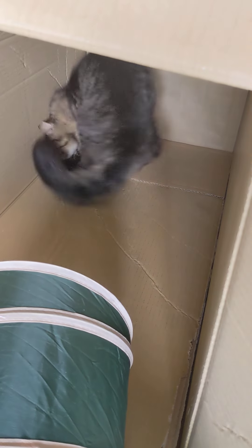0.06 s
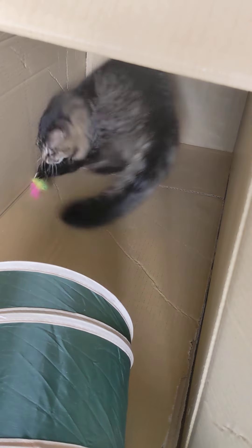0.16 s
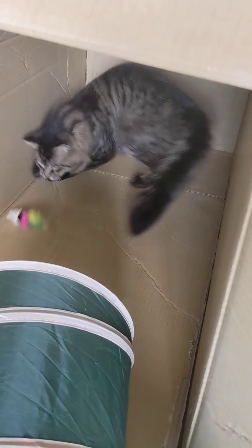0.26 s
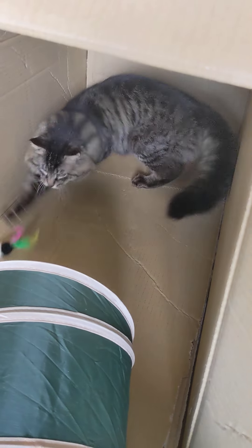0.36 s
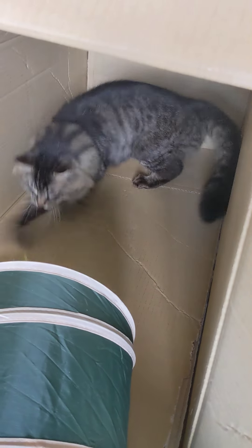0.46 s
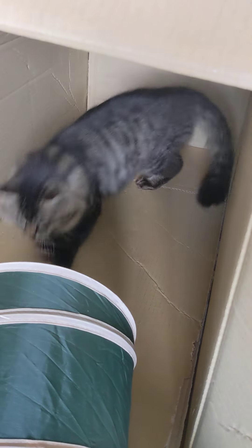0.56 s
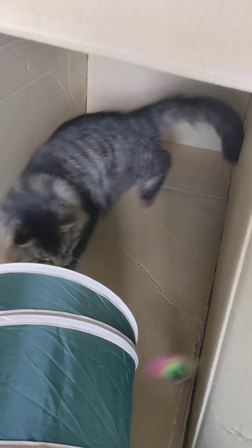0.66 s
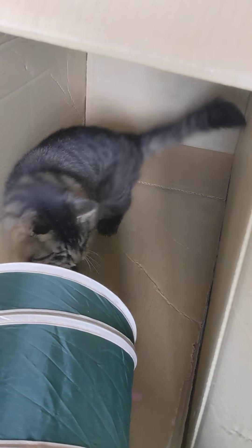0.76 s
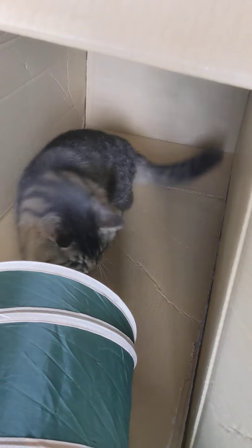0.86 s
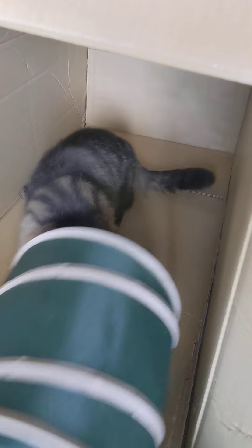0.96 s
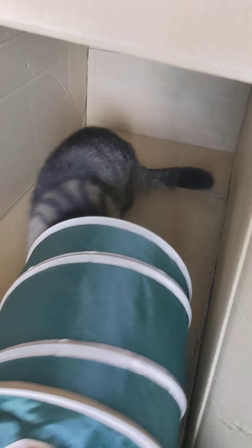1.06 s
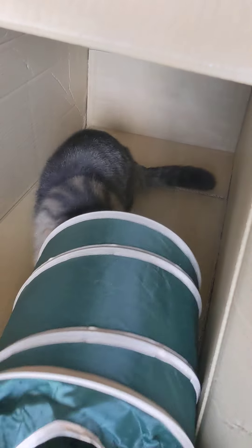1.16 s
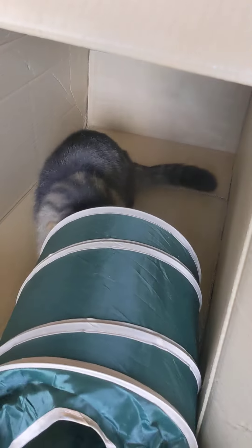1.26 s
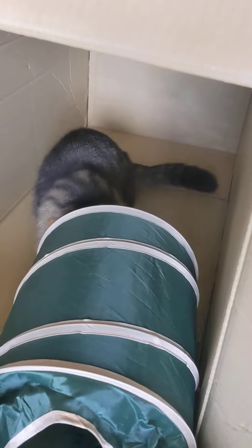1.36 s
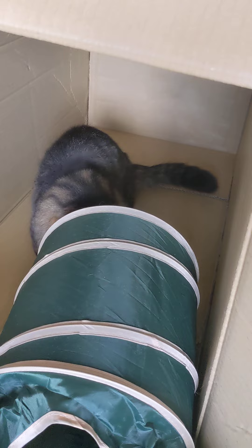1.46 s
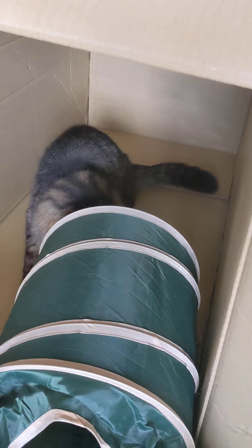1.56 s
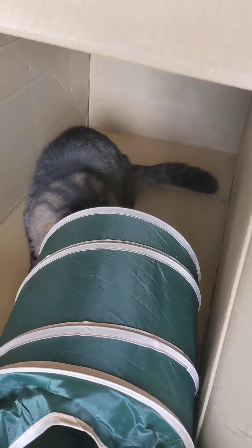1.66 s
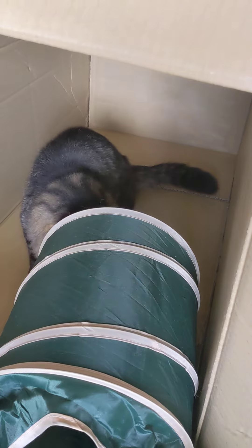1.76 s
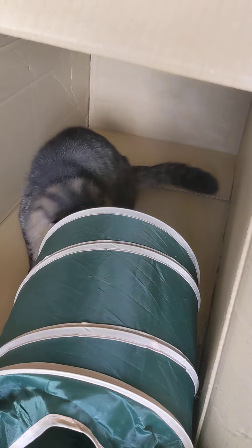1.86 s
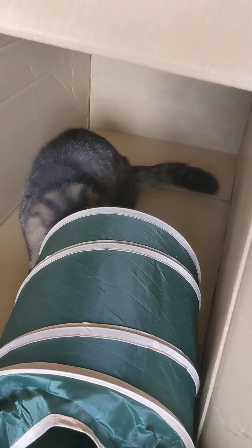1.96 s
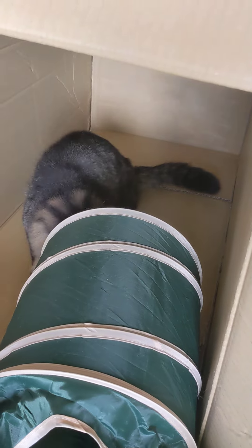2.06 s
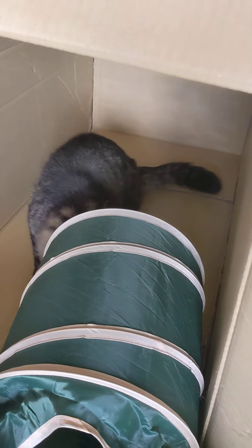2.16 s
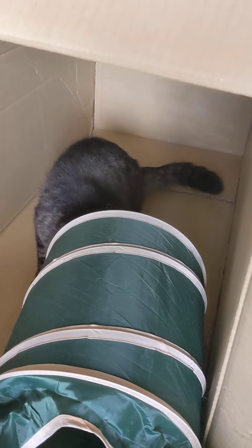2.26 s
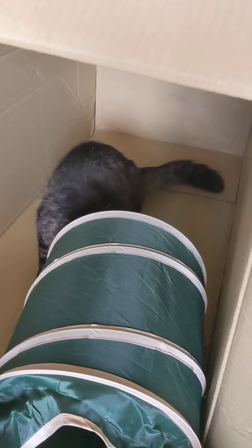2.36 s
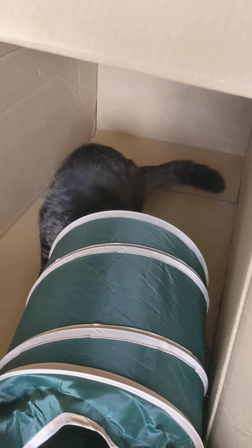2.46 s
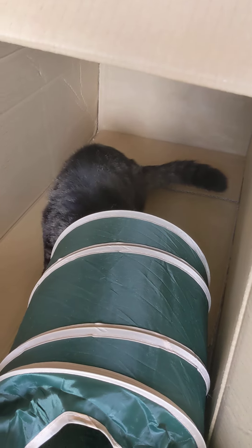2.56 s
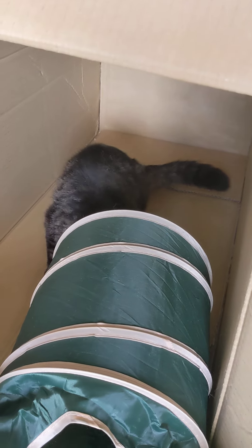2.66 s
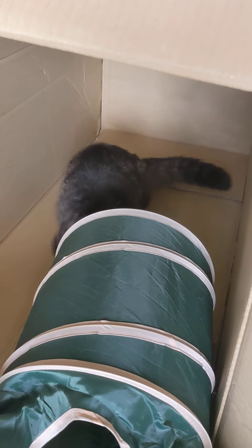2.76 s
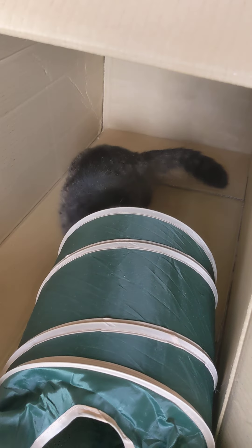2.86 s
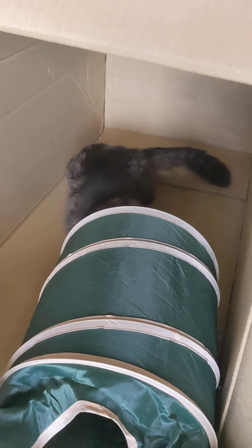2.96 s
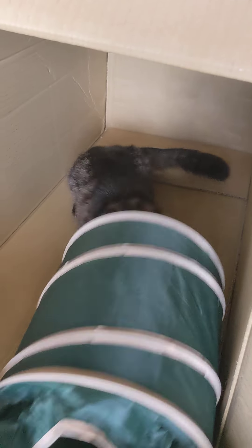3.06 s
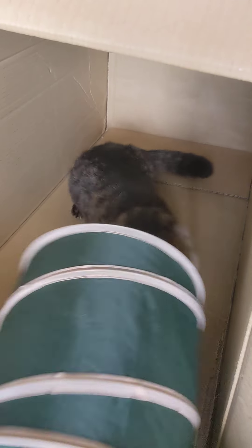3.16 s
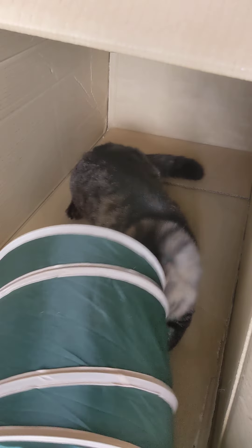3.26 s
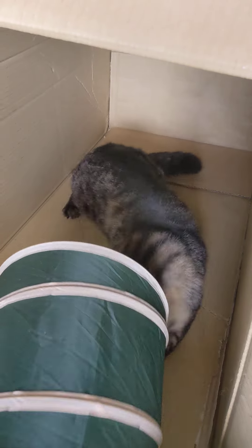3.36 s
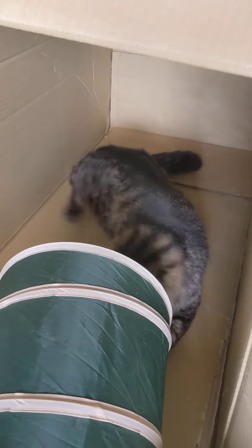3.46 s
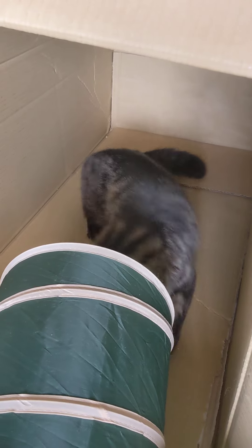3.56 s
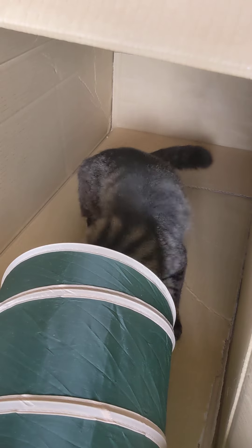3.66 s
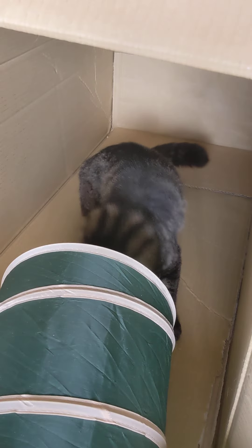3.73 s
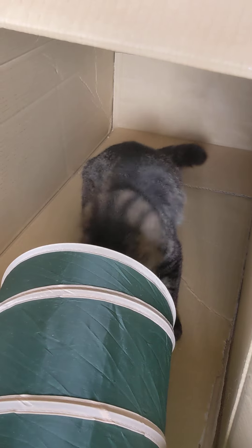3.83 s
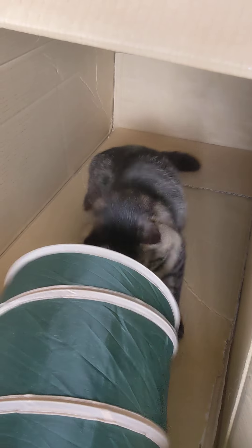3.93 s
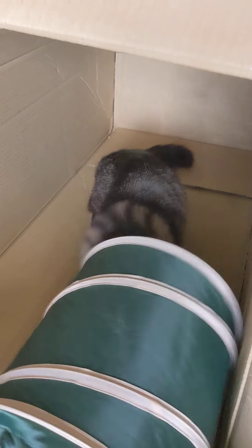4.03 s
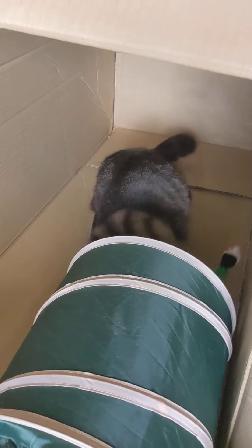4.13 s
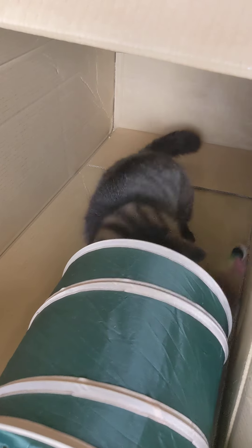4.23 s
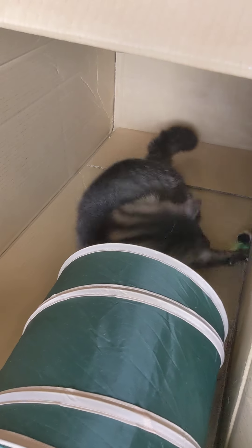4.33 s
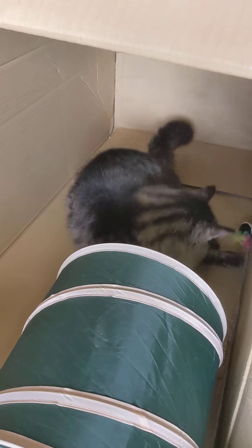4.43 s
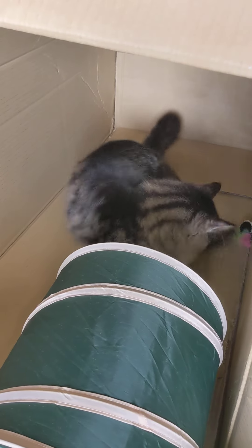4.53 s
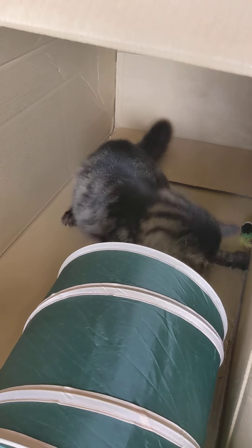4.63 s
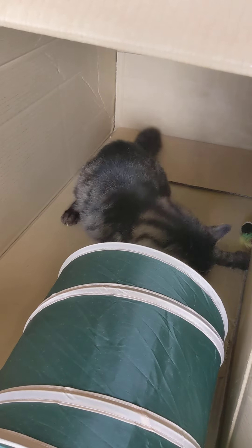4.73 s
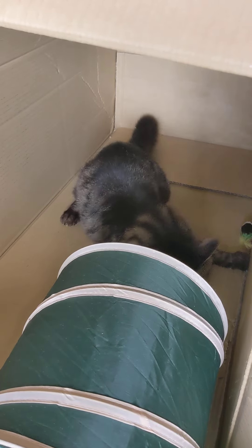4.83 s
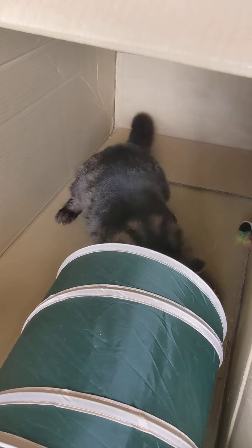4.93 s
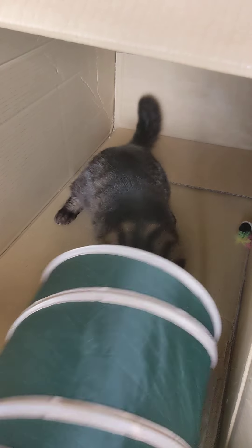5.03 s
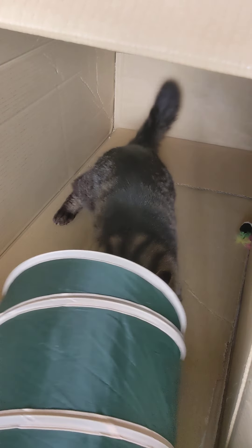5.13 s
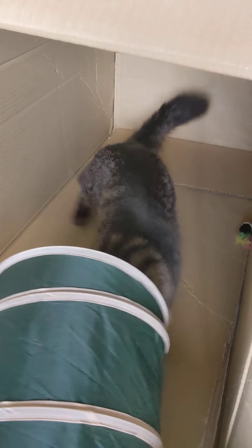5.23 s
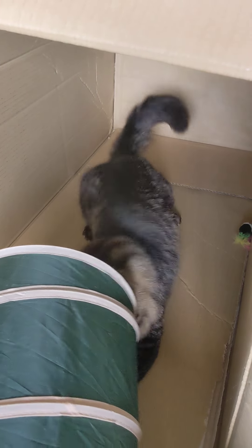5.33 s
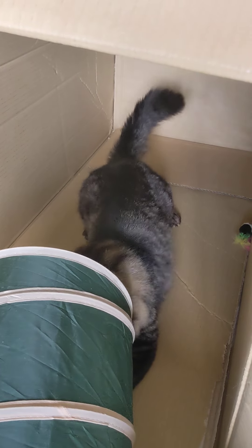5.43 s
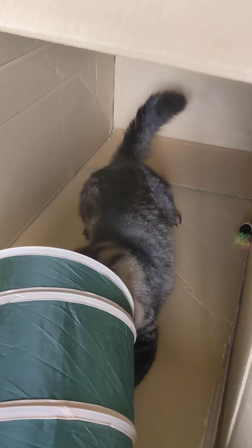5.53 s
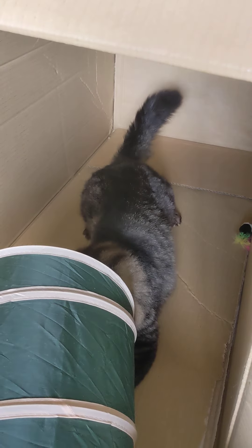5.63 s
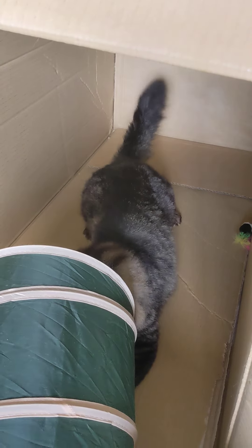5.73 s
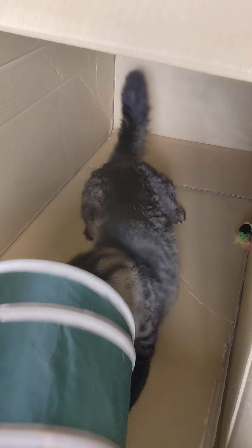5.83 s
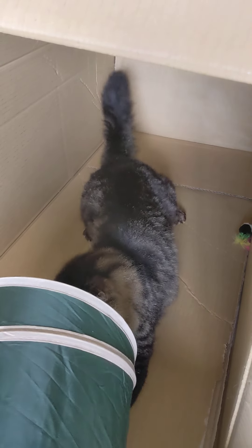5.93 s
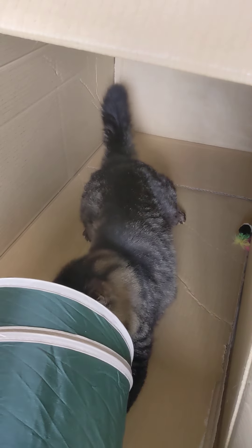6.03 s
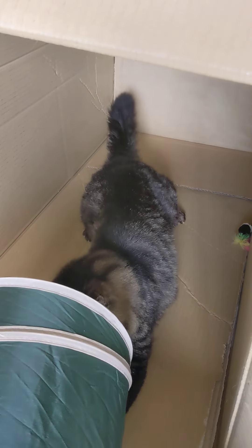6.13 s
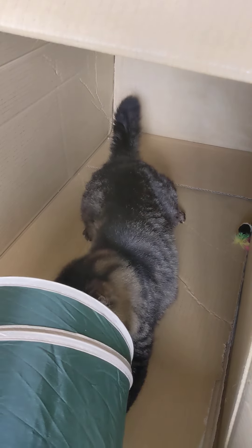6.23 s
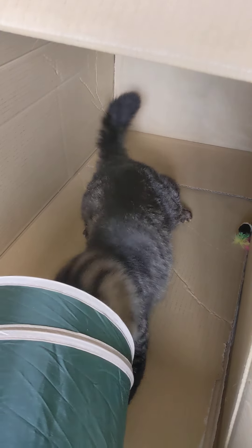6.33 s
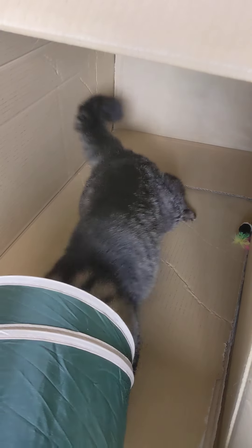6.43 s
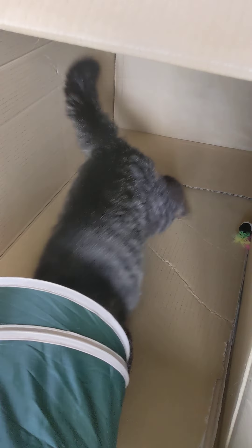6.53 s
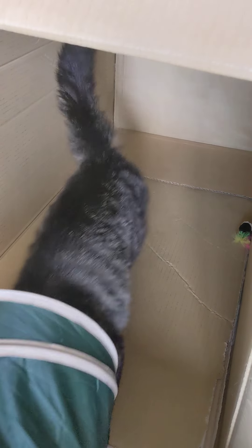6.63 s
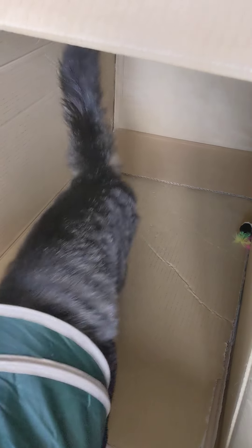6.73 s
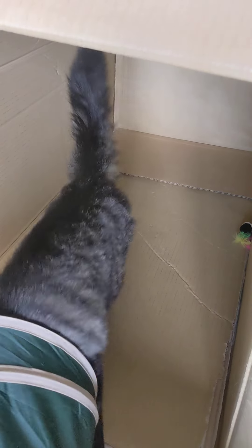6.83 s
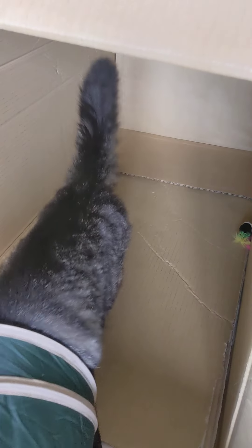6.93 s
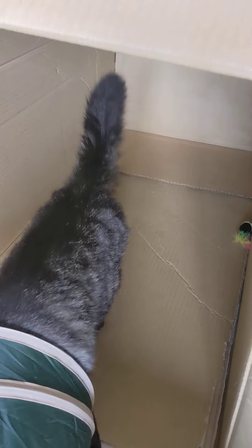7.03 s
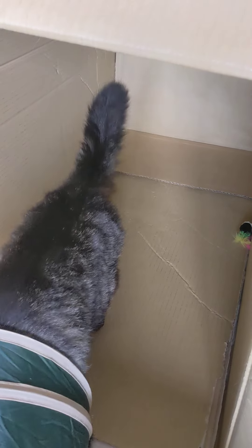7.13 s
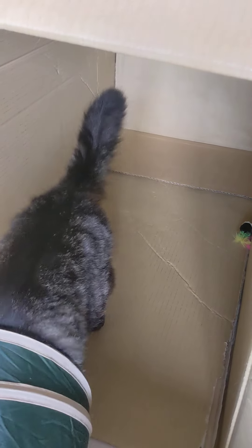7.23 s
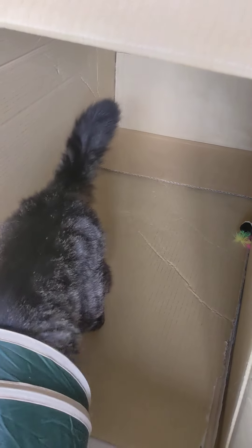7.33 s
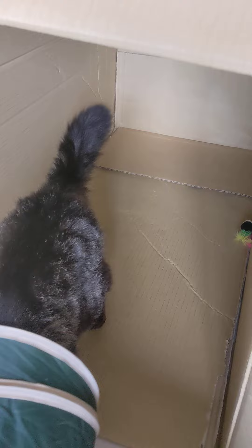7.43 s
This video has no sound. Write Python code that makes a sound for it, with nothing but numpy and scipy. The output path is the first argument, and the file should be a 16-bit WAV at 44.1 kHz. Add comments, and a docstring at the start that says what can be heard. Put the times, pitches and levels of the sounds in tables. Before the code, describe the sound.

A cat scrambles inside a big cardboard box, paws knocking and claws ticking, while a nylon tunnel swishes and scrapes, gradually settling into soft sparse rustles.

```python
"""A cat chases a toy around a big cardboard box, shoving a nylon play tunnel that lies in it.
A quiet room drones throughout. From the start paws knock the board (falling chirps, ringing sides,
booming floor), claws tick (bursts of noise), and nylon swishes over scraping cardboard (rough noise).
Dragged claws rasp from half a second on. From 1.3 to 3 s there is only rubbing; then knocks and scuffs
return, with the strongest shove at 4.2 s, and from 5.5 s all grows softer and sparser."""
import sys
import numpy as np
from scipy import signal
from scipy.fft import rfft, irfft, next_fast_len
from scipy.io import wavfile
from scipy.ndimage import map_coordinates

SR = 44100
rng = np.random.default_rng(int(sys.argv[2]) if len(sys.argv) > 2 else 0)


def generate_wav(signal):
    """Clip the signal to [-1, 1] and save it as 16-bit WAV at the path in sys.argv[1]."""
    frames = np.transpose(np.atleast_2d(signal))
    scaled = np.clip(frames, -1, 1) * 32767
    pcm = np.round(scaled).astype(np.int16)
    wavfile.write(sys.argv[1], SR, pcm)


N = 330353  # length in samples, about 7.5 s


def amp(db):
    """Turn decibels into a gain."""
    return 10 ** (np.asarray(db) / 20)


def unit(x):
    """Scale to an rms of 1."""
    return x / np.sqrt(np.mean(x ** 2) + 1e-20)


def along(points, hz):
    """Read a curve of (Hz, value) points on a log frequency axis."""
    point_hz, values = np.transpose(points)
    return np.interp(np.log(hz + 1), np.log(point_hz), values)


def wobble(rate):
    """A smooth random curve through `rate` random points a second."""
    points = rng.standard_normal(int(N * rate / SR) + 4)
    return map_coordinates(points, [np.arange(N) * rate / SR])


def filtered(x, response):
    """Colour a sound by a gain that depends on frequency."""
    n = x.shape[-1]
    padded_n = next_fast_len(n + 4096)
    hz = np.fft.rfftfreq(padded_n, 1 / SR)
    return irfft(rfft(x, padded_n) * response(hz), padded_n)[..., :n]


# How alike left and right are: pitch_hz, likeness (1 = the same, 0 = unrelated)
LIKENESS = [(100, 0.98), (300, 0.84), (650, 0.59), (1100, 0), (2000, 0.13), (4000, 0)]


def spread(pair, gain):
    """Colour two unrelated signals and mix them to stereo of rms 1: alike in the bass, apart in the treble."""
    def mid_and_side(hz):
        turn = np.arccos(np.clip(along(LIKENESS, hz), -1, 1)) / 2
        return gain(hz) * np.array([np.cos(turn), np.sin(turn)])

    mid, side = filtered(pair, mid_and_side)
    return unit(np.array([mid + side, mid - side]))


def hiss(spectrum, size):
    """Steady stereo noise with a given spectrum."""
    return spread(rng.standard_normal((2, size)), lambda hz: amp(along(spectrum, hz)))


def fade(t, rise, t60):
    """An envelope of peak 1 that rises, then dies away by 60 dB in t60 seconds."""
    shape = (1 - np.exp(-(t / rise) ** 2)) * amp(-60 * t / t60)
    return shape / (shape.max() + 1e-12)


def add(track, s, sound):
    """Mix a sound into the track at s seconds."""
    start = max(round(s * SR), 0)
    track[:, start:start + sound.shape[-1]] += sound[..., :N - start]


# How long the box walls answer: pitch_hz, t60_s
WALL_DECAY = [(100, 0.49), (400, 0.22), (1000, 0.26), (4000, 0.12), (14000, 0.13)]


def walls(x, wet_db):
    """Box walls throw a sound back many times: the sound plus a short fading tail of noise."""
    noise = rng.standard_normal((2, SR // 4))
    hz, t, cells = signal.stft(noise, SR, nperseg=256)
    fading = cells * amp(-60 * t / along(WALL_DECAY, hz)[:, None])
    tail = spread(signal.istft(fading, SR, nperseg=256)[1], np.ones_like)
    tail = tail / np.linalg.norm(tail[0])
    tail = np.pad(tail, ((0, 0), (SR // 400, 0)))  # the answer starts 2.5 ms late
    return x + amp(wet_db) * signal.fftconvolve(np.atleast_2d(x), tail, axes=1)[:, :x.shape[-1]]


# Colour of the room's rush: pitch_hz, level_db (relative, per Hz)
ROOM_COLOUR = [(20, -32), (40, -1.5), (60, 0.5), (100, 0.5), (180, -8), (330, -9.5), (420, -10), (750, -10),
               (950, -16.5), (1800, -24), (3000, -28), (6000, -28), (11000, -43), (15500, -39)]
# Narrow bands in the room's noise: pitch_hz, width_hz, level_db (relative)
ROOM_BANDS = [(558, 17, 3.5), (1366, 41, -8), (2352, 62, -3.5), (3040, 110, -15.5)]


def room():
    """A faint steady rush of noise, plus noise passed through a few narrow resonances."""
    def bands(hz):
        total = 0
        for pitch_hz, width_hz, db in ROOM_BANDS:
            damping = 1j * hz * width_hz
            total = total + amp(db) * damping / (pitch_hz ** 2 - hz ** 2 + damping)
        return np.abs(total)

    rush = amp(-57.5) * hiss(ROOM_COLOUR, N)
    return rush + amp(-60) * spread(rng.standard_normal((2, N)), bands)


def knock(t, pitch_hz, glide, t60):
    """Bending waves run faster the higher they are, so a blow on the board arrives as a falling chirp."""
    # from 1.23 times the given pitch down towards 0.36 times
    hz = pitch_hz * (0.36 + 0.872 / (1 + (t / glide) ** 2))
    return np.sin(2 * np.pi * np.cumsum(hz) / SR) * fade(t, 0.0017, t60)


def padded(x, edge_hz):
    """A soft pad stays long on the board and stirs little above its edge: a low-pass filter."""
    low_pass = signal.butter(N=4, Wn=min(edge_hz, SR / 4), fs=SR, output="sos")
    return signal.sosfilt(low_pass, x)


def ring(modes, t, cycles, detune):
    """Modes build up over a few cycles and die away; the cat's shifting weight detunes them at each blow."""
    total = 0
    for pitch_hz, db, t60 in modes:
        gain = amp(db + rng.normal(0, 2.63))
        blow_hz = pitch_hz * rng.normal(1, detune)
        total = total + gain * np.sin(2 * np.pi * blow_hz * t) * fade(t, cycles / pitch_hz, t60)
    return total


# Boom of the box floor and the air it encloses: pitch_hz, level_db (relative), t60_s
FLOOR_MODES = [(68.8, -11.5, 0.41), (99.2, 0.5, 0.17), (124.8, -6.5, 0.26), (156.7, -4, 0.14)]
# Hollow ring of the box's sides: pitch_hz, level_db (relative), t60_s
SIDE_MODES = [(179.3, -6, 0.14), (220.5, -0.5, .096), (255.6, -0.5, .11), (317.3, 2, 0.099),
              (495, -24, .08)]
# Colour of shaken cardboard panels: pitch_hz, level_db (relative, per Hz)
PANEL_COLOUR = [(60, -6.5), (150, -8), (320, -1.5), (410, -4), (480, 6.5), (560, -9.5), (650, -2), (800, 3),
                (980, -13), (1200, 1.5), (1420, -12), (1650, -8), (3000, -25), (6000, -47)]
# Pads landing on the board: start_s, knock_db, knock_pitch_hz (scales the falling chirp),
# hollow_ring_db, floor_boom_db (all levels relative)
LANDINGS = [(.008, -11.5, 553, -58, -50), (.016, -17, 525, -31, -54), (.214, -19, 708, -33, -38),
            (.221, -15, 665, -26.5, -30), (.231, -20, 690, -26, -36), (.249, -19, 660, -35, -45),
            (.425, -19.5, 670, -34, -44), (.478, -22, 554, -46, -56), (.533, -27, 475, -58, -61),
            (.602, -23, 696, -49, -47), (.621, -21, 804, -43, -45), (.638, -19.5, 434, -46, -44),
            (0.688, -31, 696, -36, -26), (.733, -7, 680, -11, -18.5), (.765, -26, 452, -33, -25),
            (.788, -21, 474, -30, -30), (.815, -15.5, 480, -33, -29.5), (1.009, -37, 560, -39.5, -50),
            (1.232, -32, 605, -39, -48), (3.02, -18.5, 666, -54, -39.5), (3.066, -27.5, 700, -49, -45),
            (3.116, -31, 460, -38, -45), (3.164, -32.5, 640, -39, -52), (3.243, -29, 617, -36, -58),
            (3.362, -35, 605, -43.5, -56), (3.632, -24, 480, -23.5, -30.5), (4.043, -30, 1000, -39.5, -47),
            (4.066, -30, 470, -34, -50), (4.091, -31.5, 970, -49, -40), (4.139, -18, 628, -27.5, -25.5),
            (4.309, -26, 457, -31.5, -26), (4.399, -32, 500, -41, -31.5), (4.426, -33, 550, -43, -41),
            (4.668, -26.5, 490, -40, -39), (5.143, -43, 505, -42.5, -42), (5.381, -26, 686, -35.5, -30.5),
            (5.959, -50, 1140, -54, -44.5), (6.633, -41, 450, -51, -42), (6.81, -39, 470, -52, -45),
            (6.995, -29, 426, -35.5, -46)]
RING_S, MEDIUM_HOLLOW_DB = 0.02, -43.5  # the knock's t60 at a medium landing, and that landing's hollow ring
RING_GROWS = 0.29  # dB of knock length per dB of hollow ring above medium


def thumps():
    """Each pad knocks the board, shakes its panels and sets the box ringing and booming."""
    out, t = np.zeros((2, N)), np.arange(SR // 3) / SR
    for s, knock_db, pitch_hz, hollow_db, boom_db in LANDINGS:
        # a landing with the body's weight behind it rings longer than a light pat
        knock_t60 = RING_S * amp(RING_GROWS * (hollow_db - MEDIUM_HOLLOW_DB))
        chirp = knock(t, pitch_hz, glide=0.00593, t60=knock_t60)
        panels = hiss(PANEL_COLOUR, len(t)) * fade(t, 0.0022, 0.073)
        blow = amp(knock_db) * padded(amp(-2) * chirp + amp(-9) * panels, edge_hz=1.35 * pitch_hz)
        hollow = amp(hollow_db - 4) * ring(SIDE_MODES, t, cycles=0.75, detune=0.029)
        boom = amp(boom_db) * ring(FLOOR_MODES, t, cycles=1.2, detune=0.029)
        add(out, s, walls(blow + hollow, wet_db=-9) + boom)
    return out


# Colour of a panel struck by a claw: pitch_hz, level_db (relative, per Hz)
CLACK_COLOUR = [(600, -55), (1000, -2), (1190, 2), (1290, -2), (1410, 1.5), (1650, -14), (1950, -9.5),
                (3000, -13.5), (6000, -54)]
# Colour of the claw tip: pitch_hz, level_db (relative, per Hz)
TICK_COLOUR = [(400, -22), (1200, 9.5), (1800, -11.5), (3000, 2.5), (5000, 0), (7000, -1), (10500, -9),
               (15000, -3)]
# Claws striking the board: start_s, panel_clack_db, claw_tick_db (levels relative)
CLAW_STRIKES = [(.008, -31, -21), (0.014, -19.5, -31), (.249, -31, -31), (.425, -27, -29),
                (0.479, -21, -30), (.602, -26.5, -38), (.622, -39, -26), (.638, -40, -29),
                (.788, -39, -24.5), (0.814, -15.5, -22.5), (1.009, -36, -26.5), (3.021, -23, -47),
                (3.065, -33, -41), (3.115, -35, -25.5), (3.165, -32, -48), (3.194, -27.5, -47),
                (3.243, -30, -35), (3.632, -25.5, -25.5), (4.045, -37.5, -27), (4.092, -33, -47),
                (4.139, -27, -37), (4.635, -30, -29.5), (4.667, -31, -26), (5.096, -33, -34),
                (5.381, -20, -25.5), (5.959, -33, -21), (6.632, -50, -39.5), (6.996, -41, -52)]


def claws():
    """A claw clacks on a panel; its tip snaps, then skids for a moment: short bursts of noise."""
    out, t = np.zeros((2, N)), np.arange(SR // 6) / SR
    for s, clack_db, tick_db in CLAW_STRIKES:
        clack = amp(clack_db - 3) * hiss(CLACK_COLOUR, len(t)) * fade(t, 0.00072, 0.038)
        snap_then_skid = fade(t, 0.00047, 0.012) + amp(-12) * fade(t, 0.0048, 0.032)
        tick = amp(tick_db) * hiss(TICK_COLOUR, len(t)) * snap_then_skid
        add(out, s, walls(clack + tick, wet_db=-11))
    return out


# Strokes of the cat's body along tunnel and box: start_s, rise_s, slide_t60_s,
# nylon_swish_db, cardboard_scrape_db (levels relative)
BODY_STROKES = [(0.009, 0.007, 0.49, -43.5, -34), (0.065, 0.009, 0.41, -36, -44),
                (0.089, 0.047, 0.51, -33.5, -31), (0.205, 0.046, 0.53, -40, -40.5),
                (0.319, 0.115, 0.19, -41, -36.5), (0.476, 0.011, 0.41, -50, -37),
                (0.6, 0.0024, 0.47, -45, -40.5), (0.619, 0.004, 0.3, -38, -39),
                (0.68, 0.015, 0.7, -40.0, -41), (0.704, 0.067, 0.53, -47, -37.5),
                (0.915, 0.002, 0.61, -40.5, -44.5), (0.963, 0.036, 0.44, -51, -41),
                (1.035, 0.022, 0.36, -44, -34.0), (1.189, 0.053, 0.54, -49.5, -43),
                (1.51, 0.026, 0.4, -39.5, -46.5), (1.624, 0.019, 0.56, -42.0, -41.5),
                (1.718, 0.012, 0.34, -42, -44.5), (1.773, 0.005, 0.38, -39, -40.5),
                (2.001, 0.042, 0.66, -59.5, -51), (2.155, 0.0082, 0.4, -59, -50),
                (2.273, 0.077, 0.27, -54, -54.5), (2.443, 0.06, 0.52, -44, -43.5),
                (2.548, 0.055, 0.46, -40.5, -63), (2.609, 0.066, 0.98, -43, -45.5),
                (2.737, 0.1, 0.62, -36, -47.0), (2.886, 0.046, 0.8, -36.5, -42.5),
                (3.012, 0.011, 0.5, -31.5, -51), (3.11, 0.003, 0.55, -39.5, -39),
                (3.186, 0.021, 0.54, -37, -36.5), (3.367, 0.069, 0.34, -46.5, -45.5),
                (3.481, 0.03, 0.27, -45, -39), (3.501, 0.062, 0.24, -37, -42.5),
                (3.619, 0.034, 0.55, -45.5, -44), (3.706, 0.11, 0.64, -37.5, -42.5),
                (3.96, 0.088, 0.51, -42, -41), (4.084, 0.005, 0.4, -40.5, -48.0),
                (4.14, 0.075, 0.41, -40.5, -43.5), (4.219, 0.0061, 0.69, -21, -27.5),
                (4.268, 0.03, 0.23, -28, -23.5), (4.417, 0.018, 0.29, -32.5, -38),
                (4.543, 0.065, 0.31, -45.5, -45.5), (4.632, 0.004, 0.38, -39.5, -33),
                (4.77, 0.002, 0.42, -38, -41), (4.93, 0.01, 0.83, -45.0, -43.5),
                (4.982, 0.026, 0.1, -41, -45), (5.094, 0.0028, 0.46, -51, -42),
                (5.128, 0.1, 0.49, -59, -48), (5.282, 0.048, 0.63, -46, -40.5),
                (5.518, 0.004, 0.89, -62, -56.0), (5.651, 0.019, 0.28, -48, -42),
                (5.713, 0.14, 0.43, -58, -51), (5.847, 0.084, 0.69, -49, -44.5),
                (6.257, 0.0081, 0.53, -70, -53), (6.287, 0.075, 0.39, -48.5, -47.0),
                (6.375, 0.042, 0.27, -40, -38.5), (6.482, 0.062, 0.72, -51.5, -50),
                (6.659, 0.071, 0.61, -54, -57), (6.769, 0.046, 0.11, -56, -54),
                (6.724, 0.25, 0.9, -63, -60), (7.174, 0.23, 0.24, -58, -64), (7.288, 0.24, 0.33, -70, -70)]
SPEED_UP = 0.71  # a stroke's speed grows with this power of time
SETTLE_DB, SETTLE_T60_S = -23, 0.25  # a faint rustle, fading within a quarter second, added under each slide
SWELL_DB = 0.52  # unevenness of the pressure


def sliding():
    """Strength of rubbing on nylon and on cardboard: strokes gather speed, slide to rest and add in power."""
    power, t = np.zeros((2, N)), np.arange(SR) / SR
    for s, rise, t60, nylon_db, board_db in BODY_STROKES:
        after = np.maximum(t - rise, 0)
        slide = amp(-60 * after / t60)
        settle = amp(SETTLE_DB - 60 * after / SETTLE_T60_S)
        release = np.hypot(slide, settle)
        speed = np.minimum(t / rise, 1) ** SPEED_UP * release / release[0]
        add(power, s, (amp([[nylon_db], [board_db]]) * speed) ** 2)
    return np.sqrt(power) * amp(SWELL_DB * wobble(40))


def friction(spectrum, rough_db, snags, snag_db):
    """Rubbing: countless tiny slips that come in clumps, and dozens of larger snags each second."""
    slips = rng.standard_normal((2, N)) * amp(rough_db * (wobble(35) + wobble(260)))
    strength = np.minimum(rng.exponential(size=N), 3)
    catches = (rng.random(N) < snags / SR) * strength
    keep = np.exp(-1 / (0.001 * SR))  # each snag dies away within milliseconds
    snaps = signal.lfilter([1], [1, -keep], catches) * rng.standard_normal((2, N))
    return spread(slips + amp(snag_db) * snaps, lambda hz: amp(along(spectrum, hz)))


PATS_PER_S, PAT_T60_S = 16, 0.033  # light shuffling steps that go with the scrape


def pats():
    """Light steps at random moments, each a short shake of the panels."""
    steps = (rng.random(N) < PATS_PER_S / SR) * rng.random(N)
    shape = fade(np.arange(SR // 8) / SR, 0.0021, PAT_T60_S)
    return signal.fftconvolve(steps, shape)[:N] * hiss(PANEL_COLOUR, N)


# Colour of the swishing tunnel cloth: pitch_hz, level_db (relative, per Hz)
NYLON_COLOUR = [(600, -30), (1500, -12), (2500, -0.5), (3500, 0), (5500, -2), (7000, 3), (8500, -0.5),
                (10500, -7), (13000, 0.5), (15500, -1.5)]
# Colour of scraped cardboard: pitch_hz, level_db (relative, per Hz)
SCRAPE_COLOUR = [(200, -27), (450, -6), (900, -4.5), (1300, 3), (1750, -2), (2350, 5), (2800, 0), (3300, 0),
                 (4500, -3), (9000, -10)]
# Colour of the flexing board: pitch_hz, level_db (relative, per Hz)
FLEX_COLOUR = [(20, -49), (50, -20), (90, 2.5), (190, -6), (320, -3), (480, 1), (650, -4), (950, -11.5),
               (2000, -20.5)]
FLEX_DB, FLEX_LAG_S, FLEX_WANDER_DB = -8, 0.029, 3  # the board gives under a scrape and settles more slowly


def rubbing():
    """The strokes make the nylon swish and crinkle, scrape fur over the cardboard and flex the board."""
    on_nylon, on_board = sliding()
    swish = on_nylon * friction(NYLON_COLOUR, rough_db=0.96, snags=130, snag_db=0)
    fur = friction(SCRAPE_COLOUR, rough_db=1.88, snags=50, snag_db=4)
    scrape = on_board * (fur + amp(1) * pats())
    # the board's load follows the scrape with a lag
    keep = np.exp(-1 / (FLEX_LAG_S * SR))
    load = signal.lfilter([1 - keep], [1, -keep], on_board)
    flex = load * amp(FLEX_DB + FLEX_WANDER_DB * wobble(43)) * hiss(FLEX_COLOUR, N)
    return walls(swish + scrape, wet_db=-6.5) + flex


# Claws dragged over the board: start_s, length_s, start_pitch_hz, end_pitch_hz, level_db (relative)
CLAW_DRAGS = [(0.48, 0.073, 1400, 1363, -45), (.608, 0.06, 1500, 1140, -39.5),
              (1.04, 0.06, 1900, 1172, -44.5), (3.191, 0.06, 2000, 1060, -41.5),
              (4.654, .055, 1900, 703, -41), (5.299, 0.042, 4700, 2630, -47.5),
              (5.331, 0.03, 1420, 1010, -41.5)]
RASP_DB = 3  # unevenness of the rasp


def scratches():
    """A dragged claw catches and rasps in a narrow band whose pitch sinks as it slows."""
    out = np.zeros((2, N))
    for s, length, start_hz, end_hz, db in CLAW_DRAGS:
        u = np.linspace(0, 1, round(length * SR))  # progress of the drag
        phase = 2 * np.pi * np.cumsum(start_hz * (end_hz / start_hz) ** u) / SR
        # slow noise carried up to the sinking pitch makes a narrow band
        chatter = filtered(rng.standard_normal((2, len(u))), lambda hz: 1 / (1 + (hz / 190) ** 2))
        rasp = unit(chatter[0] * np.cos(phase) + chatter[1] * np.sin(phase))
        uneven = amp(db + RASP_DB * wobble(121)[:len(u)])
        swell = np.sqrt(np.abs(np.sin(np.pi * u)))
        add(out, s, uneven * rasp * swell)
    return walls(out, wet_db=-9)


def scene():
    """Everything heard from just above the box, added together."""
    return room() + thumps() + claws() + rubbing() + scratches()


# Difference in colour between the two sides: pitch_hz, left_minus_right_db
LEFT_RIGHT_LEAN = [(60, -2.5), (110, 1.5), (200, -2.5), (380, -3), (700, -2), (1290, -0.5), (2380, -1),
                   (4400, 0.5), (8120, -1.5), (15000, -0.5)]
TOP_HZ = 15950  # upper band limit


def record(dry):
    """Two microphones differ a little in colour and lose the lowest bass and all above the band limit."""
    def colour(hz):
        sides = amp(np.outer([0.5, -0.5], along(LEFT_RIGHT_LEAN, hz)))
        return sides / np.sqrt(1 + (hz / TOP_HZ) ** 400)  # a very steep cut

    high_pass = signal.butter(4, 42, "high", fs=SR, output="sos")
    return signal.sosfilt(high_pass, filtered(dry, colour))


dry = scene()
out = record(dry)
generate_wav(out)
```